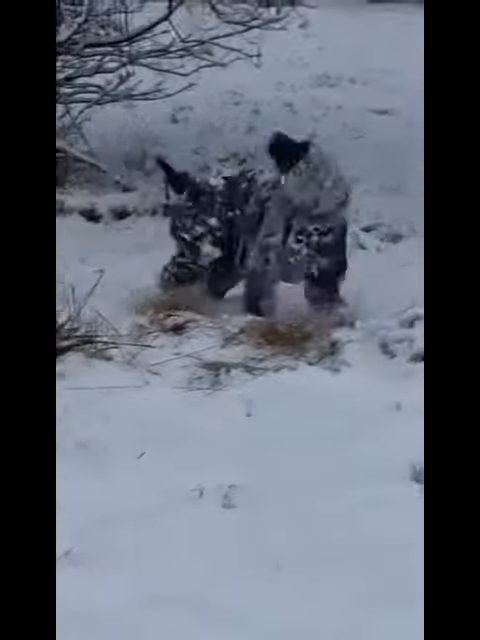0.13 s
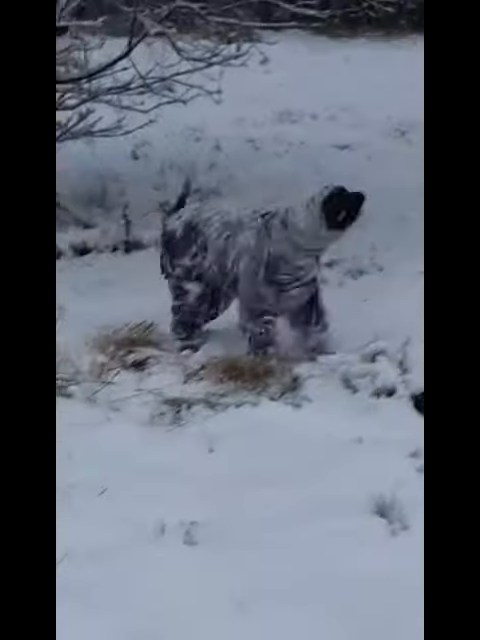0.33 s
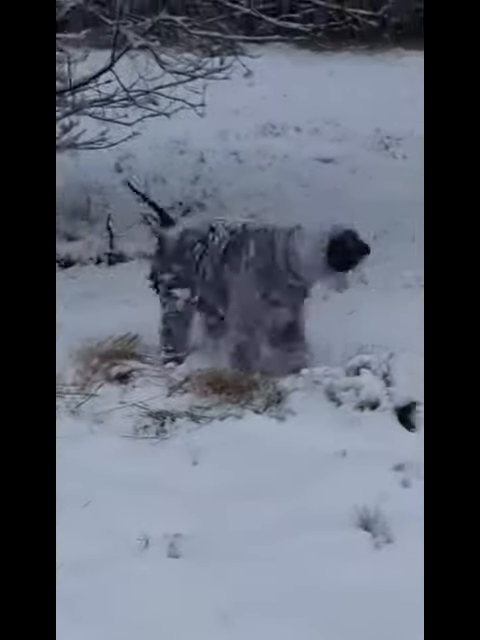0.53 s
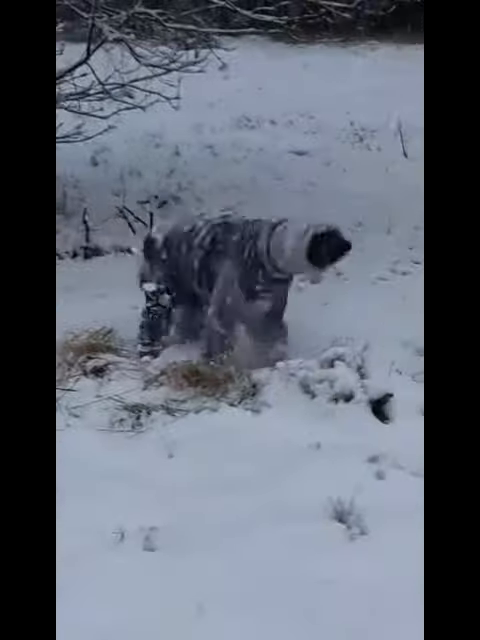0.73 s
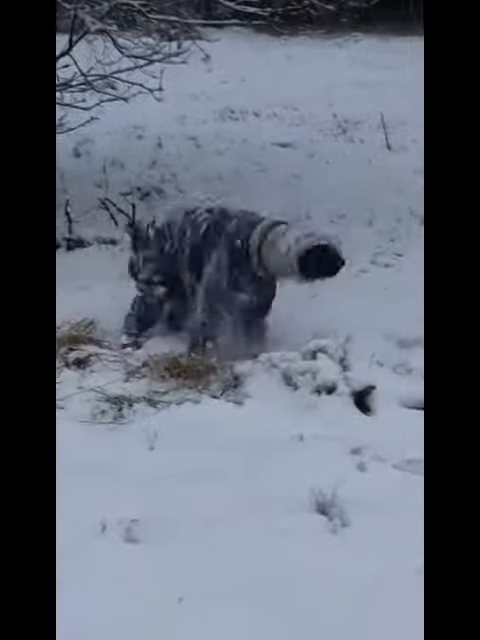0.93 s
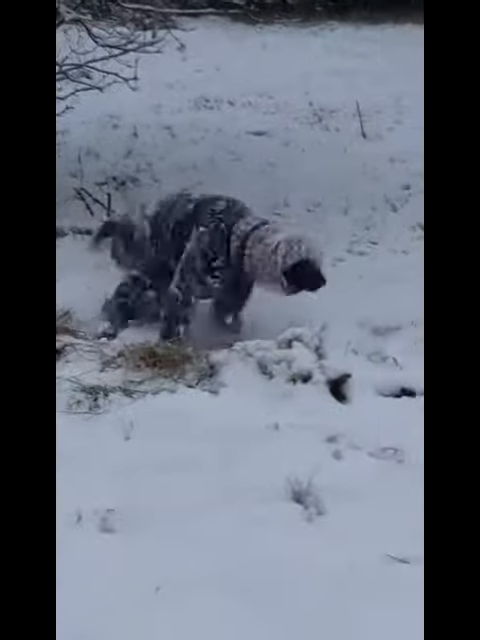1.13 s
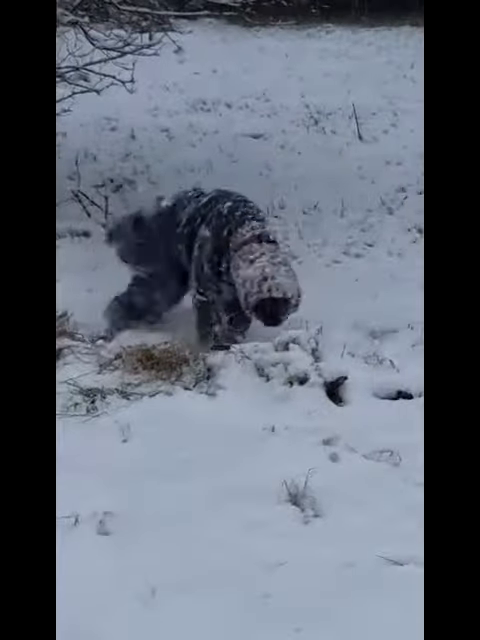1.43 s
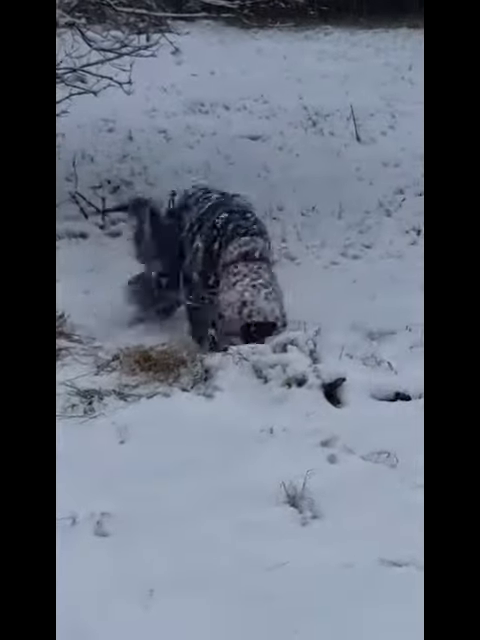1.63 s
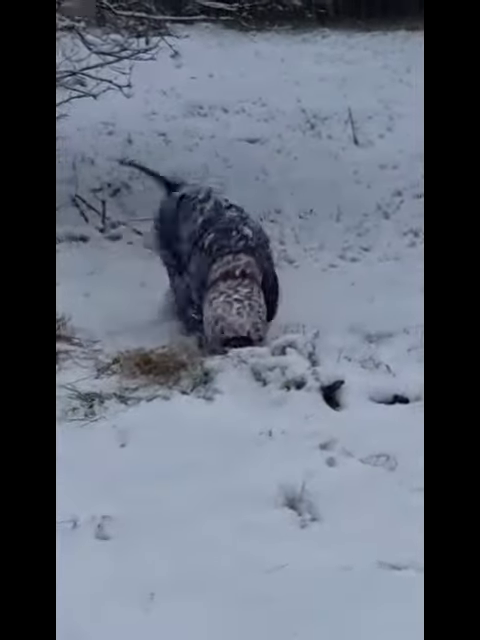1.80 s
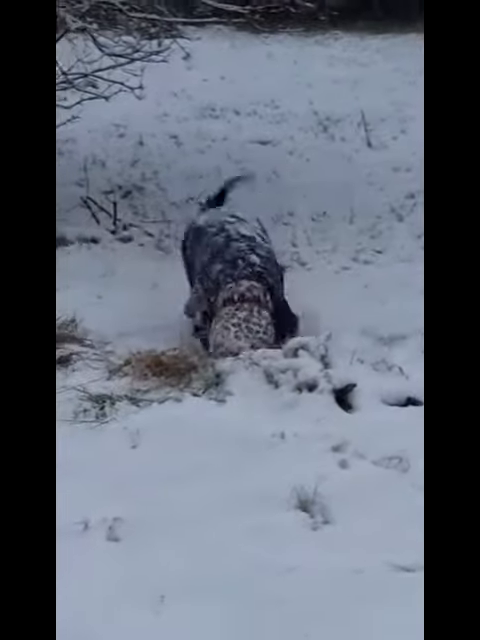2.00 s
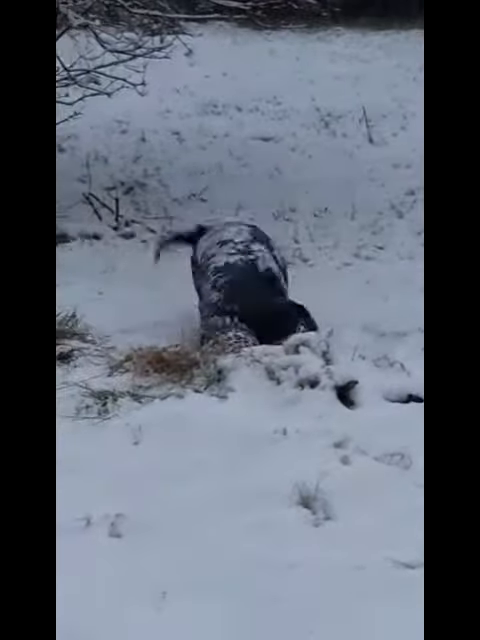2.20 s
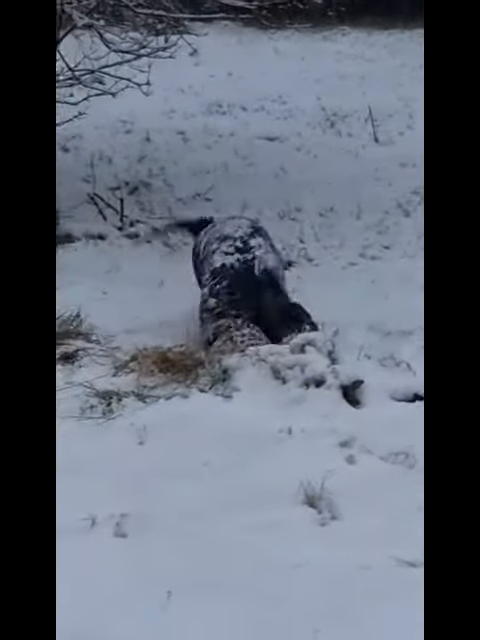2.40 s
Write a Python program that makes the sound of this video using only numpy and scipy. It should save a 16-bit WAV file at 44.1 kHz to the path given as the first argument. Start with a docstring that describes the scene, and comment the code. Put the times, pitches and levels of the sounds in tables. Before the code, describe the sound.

Sharp, bright collar clicks from a shaking dog, with faint snow patter and low wind.

```python
"""Sharp, bright clicks ring out over light wind as a dog shakes itself in a snowy field. Each swing gives an
impact, probably of its collar, that excites a few quickly damped resonances. Faint patter, ticks and crunches
of snow and stalks are heard during and after the shake. Wind buffets the microphone with low pressure swings,
and something knocks once on its left port. The microphone's own resonance adds a faint, grainy hiss near 2.4
kHz, and a light rustle of the moving dog swells through it."""
import sys
import numpy as np
from scipy import signal
from scipy.fft import rfft, irfft
from scipy.io import wavfile

SR = 44100
rng = np.random.default_rng(int(sys.argv[2]) if len(sys.argv) > 2 else 0)


def store_pcm(level_fs):
    """Save levels as 16-bit WAV."""
    pcm = np.round(np.clip(level_fs, -1, 1) * 32767).astype(np.int16)
    wavfile.write(sys.argv[1], SR, np.atleast_2d(pcm).T)


N = 112454
SHORT = 4096  # samples in a short event
T = np.arange(N) / SR
AGE = T[:SHORT]  # seconds into a short event


# Impacts of the shake, at relative levels:
# start_s, crack_db, low_db, middle_db, middle_hz, bright_db, top_db, touch_lead_s
COLLAR_IMPACTS = [(0.2434, -90, -90, -92, 3600, -47.5, -42, .007),
                  (0.4054, -51, -74, -66, 4200, -42, -56, .002),
                  (0.6397, -95, -100, -55.5, 3950, -37, -36.5, .003),
                  (0.8468, -44.5, -56, -64, 4100, -35.5, -49, .0055),
                  (1.0366, -45.5, -56, -57, 3850, -34, -50, .005),
                  (1.0483, -80, -94, -61, 4150, -38.5, -35.5, .004),
                  (1.2226, -92, -48, -56, 3800, -36, -31.5, .0025),
                  (1.3906, -80, -43, -51, 3300, -35, -41, .0035),
                  (1.5666, -94, -58.5, -64, 3600, -47, -46, .0023)]
# Resonances: pitch_hz, bandwidth_hz, gain_db, group (0 low, 1 bright, 2 top)
COLLAR_MODES = [(2360, 320, 0, 0), (8850, 450, -5.5, 1), (9660, 400, -1.5, 1), (11250, 220, -3.5, 2),
                (13240, 160, 4.5, 2)]
# Spectra of the broad crack and the high fizz of a contact: frequency_hz, gain_db
CRACK_SPECTRUM = [(500, -10.5), (1400, -14), (3200, -1), (4500, -6), (5300, -41.5), (6100, -18),
                  (7200, 2.5), (10000, 3), (14300, -2), (15500, -22)]
FIZZ_SPECTRUM = [(5500, -70), (7400, -34), (8600, -3), (10300, 0), (12000, -7), (13500, -7), (14500, -21),
                 (15400, -34)]

def collar():
    """Impact excitation: a strike and its chatter set damped modes ringing, with unpitched noise."""
    chatter_s, crack_s, apart = .0017, .0025, .55
    out = np.zeros((2, N))
    for at, crack_db, low_db, middle_db, middle_hz, bright_db, top_db, lead_s in COLLAR_IMPACTS:
        strike = 3 * (AGE == 0)
        force = contact(chatter_s, apart) + strike
        group_db = low_db, bright_db, top_db
        detunings = .2 * rng.uniform(-1, 1, len(COLLAR_MODES))  # in bandwidths
        modes = undb(middle_db) * resonance(force, middle_hz, width_hz=750)
        for (hz, width_hz, db, group), detuning in zip(COLLAR_MODES, detunings):
            mode = resonance(force, hz + detuning * width_hz, width_hz)
            modes += undb(db + group_db[int(group)]) * mode
        crack = fix_energy(colour(contact(crack_s, apart), CRACK_SPECTRUM), .02)
        fizz = fix_energy(colour(contact(chatter_s, apart), FIZZ_SPECTRUM), .013)
        click = modes + undb(crack_db) * crack + undb(bright_db - 5.5) * fizz
        add(out, at, click)
        add(out, at - lead_s, undb(-18) * click)  # a light touch precedes the strike
    out *= undb(-2) * pan(-2)
    right_lag_s = .000019
    phase_lag = 2 * np.pi * np.fft.rfftfreq(N, 1 / SR) * right_lag_s
    out[1] = irfft(rfft(out[1]) * np.exp(-1j * phase_lag), N)
    return out


# Spectrum of the scattered sound: frequency_hz, gain_db
SCATTER_SPECTRUM = [(2300, -13), (4000, -5), (7300, -19.5), (8600, -2.5), (10300, 4.5), (11500, 1),
                    (13500, -11.5), (15000, -23)]

def scattering(direct):
    """Diffuse reflection: ground and bushes return a short, exponentially decaying tail."""
    rise_s, t60_s = .003, .19
    age = T[:SR // 3]
    response = noise(len(age)) * undb(-60 * age / t60_s) * (1 - np.exp(-age / rise_s))
    tail = signal.fftconvolve(direct, fix_energy(response, 1 / SR), axes=1)[:, :N]
    return undb(-12.5) * colour(tail, SCATTER_SPECTRUM)


# Relative level of the falling loose snow: time_s, level_db
PATTER_ENVELOPE = [(0, -67), (.1, -80), (.16, -68), (.36, -66), (.6, -64.5), (.8, -67.5), (.98, -69.5),
                   (1.15, -65.5), (1.5, -66), (1.8, -67), (2.0, -67.5), (2.15, -73.5), (2.42, -73),
                   (2.52, -63), (2.55, -69.5)]
# Its spectrum: frequency_hz, gain_db
PATTER_SPECTRUM = [(5500, -60.5), (7700, -42), (8700, -10.5), (9900, 4), (11200, -7), (12300, -15),
                   (13300, -11.5), (14200, -25), (15200, -42.5)]

def snow_patter():
    """Shot noise: fine grains of snow land at random over a soft hiss."""
    impacts = grains(N, per_s=900, apart=.44)
    patter = unit_rms(colour(impacts, PATTER_SPECTRUM)) * undb(-6) * pan(-16)
    hiss = unit_rms(colour(noise(N), PATTER_SPECTRUM)) * undb(-6.5) * pan(1.5)
    return (patter + hiss) * curve(PATTER_ENVELOPE)


# Single ticks of snow crust and stalks: start_s, relative_peak_db
TICK_EVENTS = [(0.2325, -37), (0.3253, -48), (0.346, -47.5), (0.578, -39), (0.594, -37.5), (0.654, -34),
               (0.6992, -46), (0.7677, -48), (0.7914, -51), (1.1543, -48.5), (1.292, -39.5), (1.669, -44),
               (1.695, -49), (1.7542, -48), (1.8251, -45), (1.855, -46.5), (1.944, -50), (2.0392, -48),
               (2.0775, -48), (2.333, -50), (2.375, -48.5)]
# Their spectrum: frequency_hz, gain_db
TICK_SPECTRUM = [(2000, -37.5), (4000, -28.5), (5500, -58), (7300, -38.5), (8800, 2.5), (9900, 11),
                 (12000, -7), (13700, -6), (15200, -32)]

def ticks():
    """Transient excitation: very brief contacts with crust and stalks radiate mostly treble."""
    out = np.zeros((2, N))
    for at, db in TICK_EVENTS:
        tick = colour(contact(decay_s=.0018, apart=.99), TICK_SPECTRUM)
        add(out, at, tick / abs(tick).max() * undb(db + 1) * pan(-7))
    return out


# Soft crunches under paws and muzzle: start_s, relative_level_db, decay_s
CRUNCH_EVENTS = [(.578, -75, 0.004), (0.591, -68, 0.004), (0.698, -71, 0.015), (.785, -70, 0.025),
                 (.815, -72, 0.01), (1.694, -72, 0.008), (1.826, -72, 0.013)]
# Their spectrum: frequency_hz, gain_db
CRUNCH_SPECTRUM = [(500, 12), (1500, 1), (2300, 14), (3000, 0.5), (4200, 2), (5200, -60)]

def crunches():
    """Granular compaction: pressed snow gives way in a fading cluster of impulses."""
    out = np.zeros((2, N))
    for at, db, decay_s in CRUNCH_EVENTS:
        grit = grains(SHORT, per_s=500, apart=.55) * np.exp(-AGE / decay_s)
        grit += .07 * contact(decay_s)
        add(out, at, fix_energy(colour(grit, CRUNCH_SPECTRUM), .05) * undb(db))
    return out


# Spectrum of the blow on the left port: frequency_hz, gain_db
KNOCK_SPECTRUM = [(30, -16), (200, -11), (480, 1.5), (1000, -9), (1600, -14), (2200, -6), (3200, -18.5),
                  (4200, -22.5), (5100, -22), (5700, -60), (7500, -48), (8800, -6.5), (9900, -1.5),
                  (11300, -13.5), (12300, -16), (13300, -12), (15000, -26)]

def port_knock():
    """Damped oscillation: a blow scratches and snaps on the port and swings the diaphragm."""
    start_s, snap_lag_s = .5432, .0017
    swing_hz, swing_decay_s = 126, .0069
    snap = -1. * (np.arange(SHORT) == int(snap_lag_s * SR))
    blow = unit_rms(contact(decay_s=.0033)) + undb(-6.5) * unit_rms(snap)
    scratch = fix_energy(colour(blow, KNOCK_SPECTRUM), .0019) * undb(-26.5)
    swing = -np.sin(2 * np.pi * swing_hz * AGE) * np.exp(-AGE / swing_decay_s) * undb(-27.5)
    out = np.zeros((2, N))
    add(out, start_s, (scratch + swing) * undb([[0], [-26]]))  # faint on the right
    return out


# Spectrum of the rumble on the ports: frequency_hz, gain_db
RUMBLE_SPECTRUM = [(12, -12.5), (25, -10), (50, 3), (80, 7), (115, 2), (160, -3), (230, -22), (400, -49),
                   (2000, -95)]
# Single eddies: centre_s, relative_level_db, pitch_hz
EDDIES = [(0.059, -42.5, 76.5), (.41, -45, 82), (.65, -49, 97.5), (0.818, -45.5, 93), (1.143, -42.5, 85.5),
          (1.266, -46, 80.6), (1.492, -42.5, 73), (1.759, -41, 91), (1.795, -44, 130), (1.827, -45, 147),
          (1.988, -41.5, 70), (2.31, -42, 101), (2.391, -42, 81), (2.50, -47, 84)]

def wind_buffeting():
    """Turbulent pressure: the ports rumble, and each eddy briefly swings mainly the right diaphragm."""
    out = unit_rms(colour(noise(N), RUMBLE_SPECTRUM)) * undb(-55) * pan(-5)
    offset_s, sigma_s = AGE - AGE.mean(), .005
    envelope = np.exp(-.5 * (offset_s / sigma_s) ** 2)
    phases = np.pi * rng.uniform(-.97, 1, len(EDDIES))
    for (at, db, hz), phase in zip(EDDIES, phases):
        eddy = np.cos(2 * np.pi * hz * offset_s + phase) * envelope
        add(out, at + offset_s[0], eddy * undb(db - 2) * pan(-18.5))
    return out


# Level of the rush of air: time_s, level_db
AIR_ENVELOPE = [(0, -60.5), (.1, -64.5), (.4, -62.5), (.52, -60.5), (.6, -59.5), (.8, -56.5), (1.0, -64),
                (1.2, -60), (1.4, -63.5), (1.5, -60.5), (1.95, -59.5), (2.08, -63.5), (2.28, -63.5),
                (2.35, -57.5), (2.42, -63), (2.55, -60)]
# Its spectrum: frequency_hz, gain_db
AIR_SPECTRUM = [(100, -0.5), (250, 1.5), (400, -4), (560, -8), (800, -16), (1100, -24.5), (1700, -33.5),
                (4000, -67.5)]

def air_rush():
    """Flow noise: moving air makes a low rush, partly coherent between the channels."""
    return unit_rms(colour(noise(N, apart=.76), AIR_SPECTRUM)) * curve(AIR_ENVELOPE)


# Level of the grainy hiss: time_s, level_db
HISS_ENVELOPE = [(0, -68.5), (.1, -84), (.35, -84.5), (.5, -79), (.8, -76.5), (1.0, -73.5), (1.2, -71),
                 (1.5, -76.5), (1.7, -79.5), (1.9, -83.5), (2.1, -83.5), (2.45, -86.5), (2.55, -79.5)]
# Its spectrum, peaking at the microphone's resonance: frequency_hz, gain_db
HISS_SPECTRUM = [(1000, -19), (1650, -16), (2400, 2.5), (3000, -21), (3700, -20.5), (4600, -36),
                 (7000, -40), (9000, -51)]

def hiss_and_rustle():
    """Resonant self-noise and rustle: a faint, grainy hiss near 2.4 kHz, through which a light rustle of the
    moving dog swells."""
    knots_s = np.linspace(0, T[-1], 64)
    surge_db = 4 * np.interp(T, knots_s, rng.standard_normal(len(knots_s)))
    hiss = colour(grains(N, per_s=1500, apart=.97), HISS_SPECTRUM)
    return unit_rms(hiss * undb(surge_db)) * curve(HISS_ENVELOPE) * pan(3.5)


def contact(decay_s, apart=1):
    """Exponential decay: a rough contact as a short burst of noise."""
    return noise(SHORT, apart) * np.exp(-AGE / decay_s)


def resonance(force, hz, width_hz):
    """Resonance: a steep band-pass rings near one frequency, scaled to a set energy."""
    edges_hz = [hz - width_hz / 2, hz + width_hz / 2]
    band = signal.butter(3, edges_hz, "bandpass", fs=SR, output="sos")
    return fix_energy(signal.sosfilt(band, force), .0085)


def grains(size, per_s, apart):
    """Poisson process: independent stereo impulses of random strength."""
    return (rng.random(size) < per_s / SR) * noise(size, apart)


def noise(size, apart=1):
    """Partial coherence: stereo noise, identical in both channels at apart 0, unrelated at 1."""
    independent = rng.standard_normal((2, size))
    common = rng.standard_normal(size)
    return apart * independent + np.sqrt(1 - apart ** 2) * common


def colour(x, spectrum):
    """Minimum-phase filtering through (frequency_hz, gain_db) points."""
    hz, db = np.array(spectrum).T
    size = 2 ** int(np.ceil(np.log2(x.shape[-1] + SHORT)))
    bins_hz = np.fft.rfftfreq(size, 1 / SR)
    gain = undb(np.interp(np.log(bins_hz + 1), np.log(hz), db))
    cepstrum = irfft(np.log(gain))
    cepstrum[1:size // 2] *= 2  # folding onto positive time makes the filter causal
    cepstrum[size // 2 + 1:] = 0
    return irfft(rfft(x, size) * np.exp(rfft(cepstrum)))[..., :x.shape[-1]]


def undb(db):
    """Decibels to amplitude ratio."""
    return 10 ** (np.asarray(db) / 20)


def pan(db):
    """Channel gains for a level difference, left minus right."""
    return undb(np.array([[db], [-db]]) / 2)


def unit_rms(x):
    """Normalisation to rms 1."""
    return x / np.sqrt(np.mean(x ** 2))


def fix_energy(x, seconds):
    """Normalisation of each channel to the energy of rms 1 held for so many seconds."""
    return x * np.sqrt(seconds * SR / np.sum(x ** 2, axis=-1, keepdims=True))


def curve(rows):
    """Amplitude envelope through (time_s, level_db) points."""
    return undb(np.interp(T, *np.array(rows).T))


def add(out, at, x):
    """Superposition of a short sound, starting at a time in seconds."""
    start = int(at * SR)
    lo, hi = max(start, 0), min(start + x.shape[-1], N)
    out[:, lo:hi] += x[:, lo - start:hi - start]


def scene():
    """Superposition: all sources add at the microphone."""
    clicks = collar()
    dog = clicks + scattering(clicks) + snow_patter() + ticks() + crunches()
    return dog + hiss_and_rustle() + port_knock() + wind_buffeting() + air_rush()


def record(dry):
    """Band limiting: a steep low-pass removes the highest treble."""
    cutoff_hz = 15400
    return signal.sosfilt(signal.ellip(8, .2, 70, cutoff_hz, fs=SR, output="sos"), dry)


dry = scene()
out = record(dry)
store_pcm(out)
```